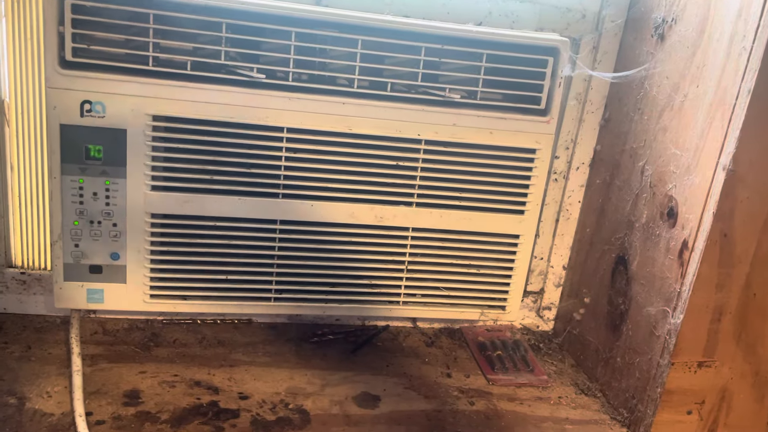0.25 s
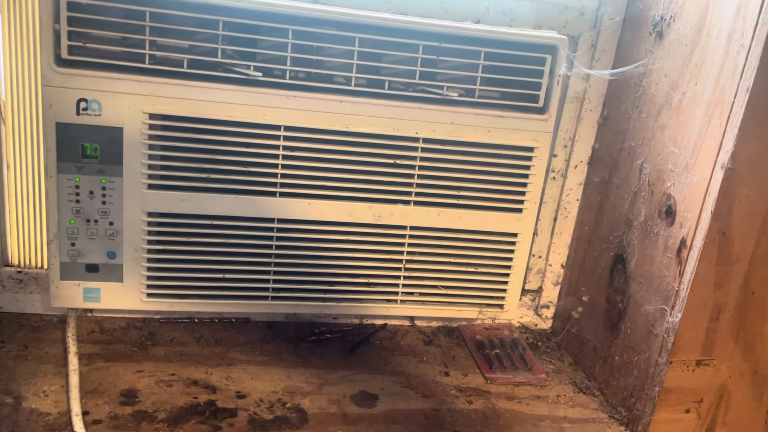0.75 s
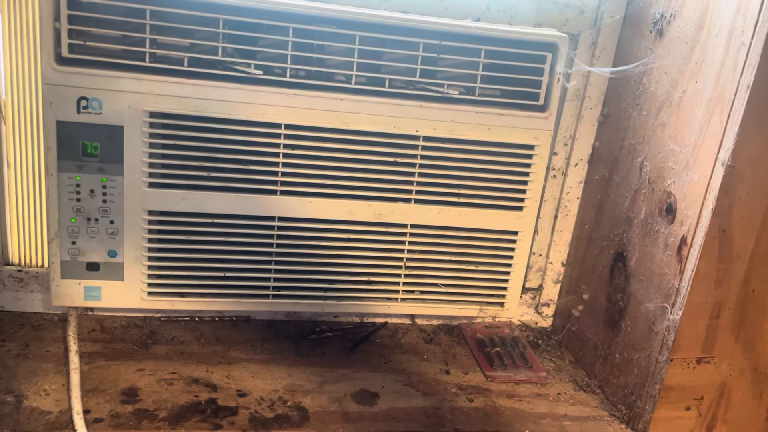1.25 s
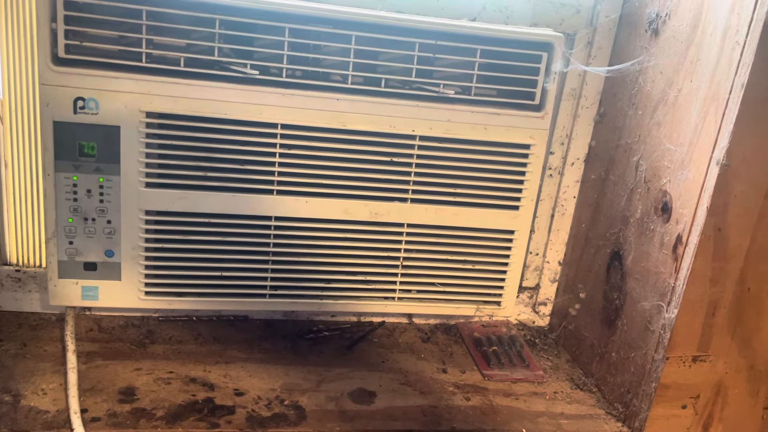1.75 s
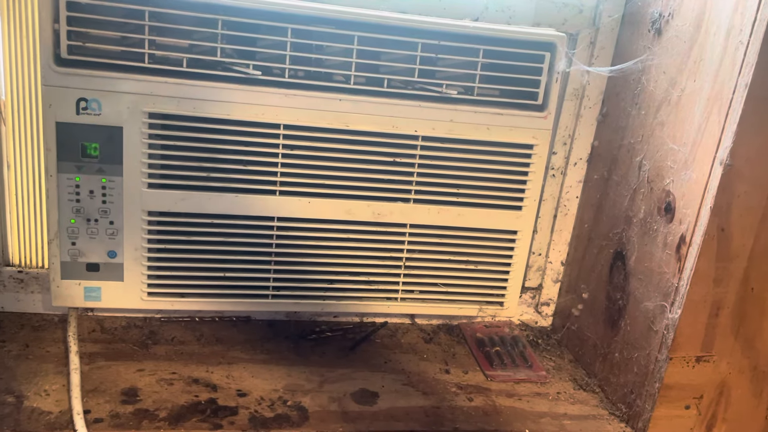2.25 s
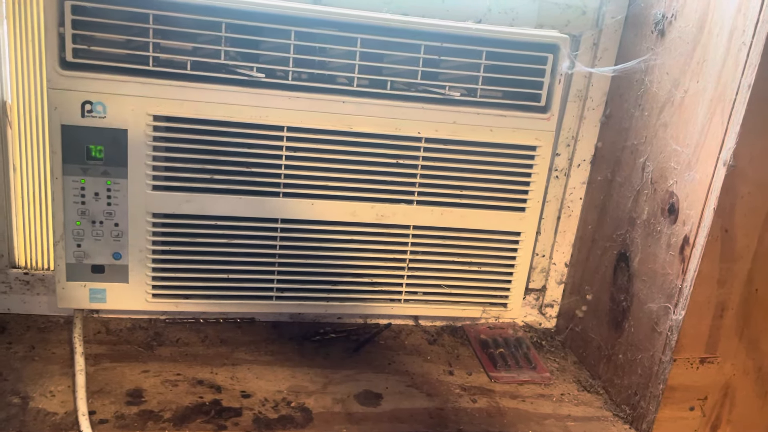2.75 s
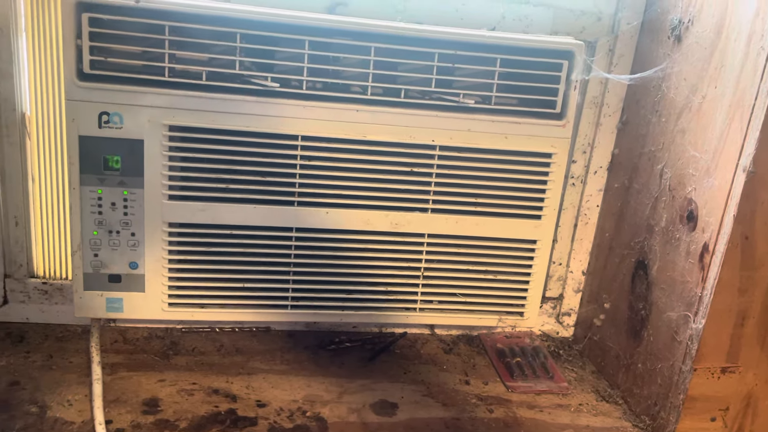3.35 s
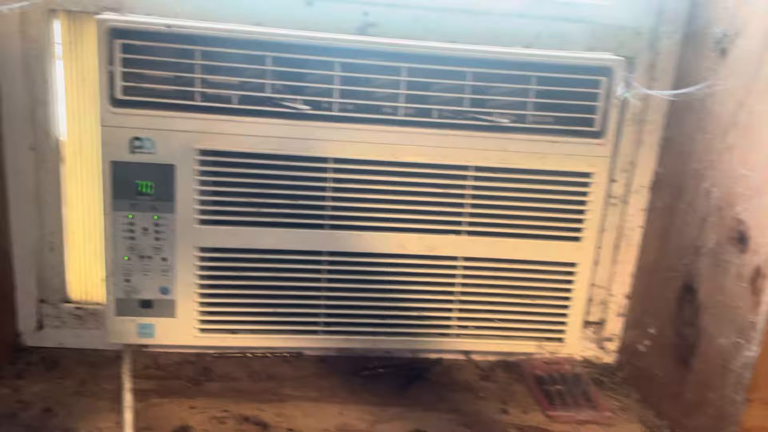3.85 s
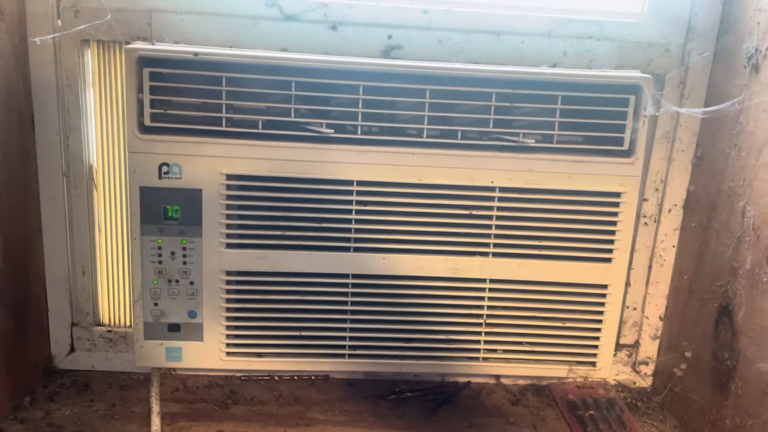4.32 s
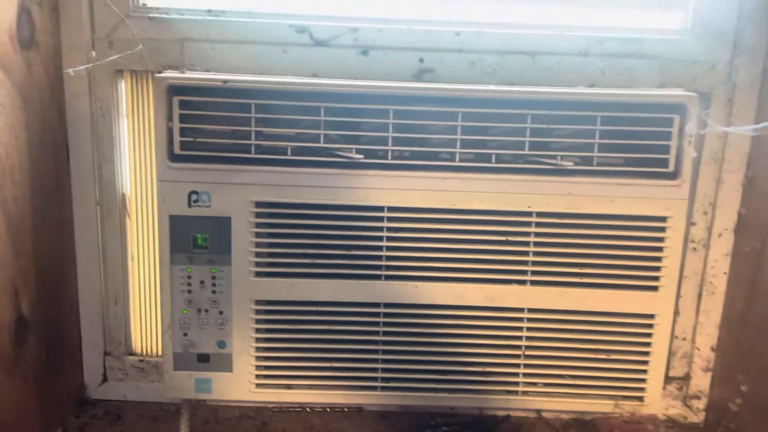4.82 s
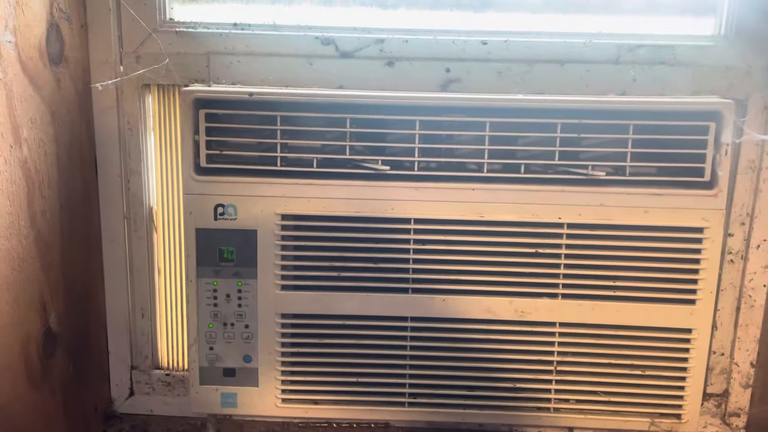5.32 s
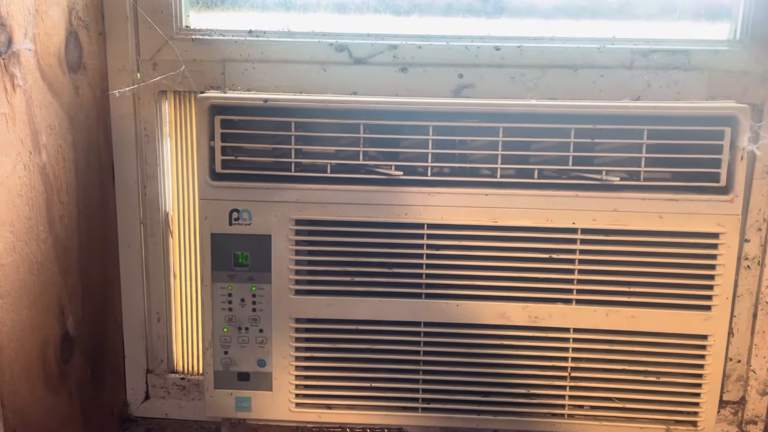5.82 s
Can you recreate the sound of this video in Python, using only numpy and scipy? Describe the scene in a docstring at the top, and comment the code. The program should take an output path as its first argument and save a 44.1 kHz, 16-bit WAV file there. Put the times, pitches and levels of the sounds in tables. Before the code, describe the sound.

Steady close machine noise: a deep, slightly wavering fan drone around 100 hertz, electrical buzz, faint thin whine, and thick turbulent air coloured by a resonant cabinet and grille. Short dull puffs of moving air bump the hand-held stereo microphone at uneven intervals. After about three seconds it rises from the lower grille toward the outlet, subtly shifting the tone while loudness stays nearly constant. The top end is dull.

```python
"""Air rushes through a window air conditioner in a wooden alcove: noise shaped by a resonant cabinet and grille.
The fan hums on multiples of its shaft speed, and the motor adds a buzz and a faint whine.
Eddies in the outflow buffet a hand-held stereo microphone with short low swings and noise.
The microphone moves from the lower grille up towards the outlet; the hand on its case rustles faintly."""
import sys
import numpy as np
from scipy import signal
from scipy.fft import rfft, irfft
from scipy.io import wavfile
from scipy.ndimage import map_coordinates

SR = 44100
rng = np.random.default_rng(int(sys.argv[2]) if len(sys.argv) > 2 else 0)


def dump_mix(stems):
    """Bounce the given channels to the path in sys.argv[1] as a 16-bit WAV at rate SR."""
    frames = np.atleast_2d(stems).T  # one column per channel
    limited = np.clip(frames, -1, 1)  # hard clip at full scale
    pcm = np.round(limited * 32767).astype(np.int16)
    wavfile.write(sys.argv[1], SR, pcm)


N = 268128
T = np.arange(N) / SR  # time in seconds
HZ = np.maximum(np.arange(N // 2 + 1) * SR / N, 1)  # spectrum frequencies, kept above zero for logs


def from_db(db):
    """Turn decibels into gain."""
    return 10 ** (np.asarray(db) / 20)


def at_hz(points, column=1):
    """Read a table's column at every frequency, joining its points on a log axis."""
    rows = np.array(points)
    return np.interp(np.log(HZ), np.log(rows[:, 0]), rows[:, column])


def white():
    """Make the spectrum of white noise at 0 dB per Hz."""
    return rfft(rng.standard_normal(N)) * np.sqrt(SR / 2)


def drift(rate):
    """Wander at random around 0 with spread 1, changing about rate times a second."""
    slow = irfft(white() / (1 + (HZ / rate) ** 2), N)
    return (slow - slow.mean()) / slow.std()


def swell(crest_s, half_s):
    """Rise and fall in a bell shape of height 1; half_s is the bell's standard deviation."""
    return np.exp(-.5 * np.minimum(((T - crest_s) / half_s) ** 2, 100))


def burst(crest_s, level_db, half_s, low_hz, high_hz):
    """Let noise in one band swell briefly, with the given rms level at its crest."""
    band = signal.butter(2, [low_hz, max(high_hz, low_hz + 10)], "band", fs=SR, output="sos")
    shape = swell(crest_s, half_s)
    near = abs(T - crest_s) < .25
    # filter a whole second twice, then use its settled end
    hiss = signal.sosfilt(band, signal.sosfilt(band, rng.standard_normal(SR)))
    noise = np.zeros(N)
    noise[near] = shape[near] * hiss[-near.sum():]
    return from_db(level_db) * noise * np.sqrt(np.sum(shape ** 2) / np.sum(noise ** 2))


def ports(balance_db, lead):
    """Give the left and right ports a level and phase difference, keeping their mean power at 1."""
    half = from_db(balance_db / 2) * np.exp(.5j * lead)
    pair = np.array([half, 1 / half]).reshape(2, -1)
    return pair / np.sqrt(np.mean(abs(pair) ** 2, axis=0))


# Faint brushes of the hand on the microphone's case, before the grain is added:
# (crest_s, level_db, half_length_s, low_hz, high_hz)
HAND_BRUSHES = [(1.713, -77.5, 0.011, 4600, 6700)]


def handling(grain_db=2.0, grain_per_s=250):
    """The hand shifts its grip: a soft noise burst with fast random level changes makes a grainy rustle."""
    grain = from_db(grain_db * (drift(grain_per_s) - .5))
    return sum(burst(*brush) for brush in HAND_BRUSHES) * grain


MAINS_HZ, MOTOR_DB = 60.015, -52
WHINE_HZ, WHINE_DB = 948, -72.5


def motor_hum(whine_wander_rad=0.81):
    """The windings buzz at twice the mains frequency, under a faint, slightly unsteady whine."""
    buzz = from_db(MOTOR_DB) * np.sin(2 * np.pi * 2 * MAINS_HZ * T)
    whine = from_db(WHINE_DB) * np.sin(2 * np.pi * WHINE_HZ * T + whine_wander_rad * drift(1.5))
    return np.sqrt(2) * (buzz + whine)  # the levels are rms


# Weaker eddies: how many, their peak level, range of swing rates, and half length in swings
WEAK_PER_S, WEAK_PEAK_DB, WEAK_SWING_HZ, WEAK_SWINGS = 2.5, -35, (60, 171), 1


def weak_eddies():
    """Eddies come off at loose intervals, each with its own swing rate; rows as in STRONG_EDDIES."""
    count = int(WEAK_PER_S * N / SR)
    eddies = []
    for k, (when, size) in enumerate(rng.random((count, 2))):
        crest_s = (k + when) / WEAK_PER_S
        swing_hz = np.interp(size, (0, 1), WEAK_SWING_HZ)
        eddies.append((crest_s, WEAK_PEAK_DB, swing_hz, WEAK_SWINGS))
    return eddies


# The strongest eddies striking the microphone; peak level and length are those of the smooth swing:
# (crest_s, peak_db, swing_rate_hz, half_length_swings)
STRONG_EDDIES = [(0.203, -23, 98, 0.45), (0.356, -29, 60, 0.96), (0.429, -27.5, 60, 1.15),
                 (0.503, -29, 80, 0.48), (0.91, -29.5, 65.4, 0.59), (1.025, -32, 60, 1.2),
                 (1.167, -22.5, 98, 0.77), (1.59, -23, 105, 0.41), (1.655, -27.5, 105, 0.37),
                 (2.43, -34, 65, 1.1), (3.13, -23.5, 74.6, 0.42), (3.156, -26.5, 64, 0.82),
                 (3.391, -22.5, 112, 0.62), (3.407, -29.5, 60, .7), (3.46, -27.5, 76.3, 0.65),
                 (3.58, -29.5, 89, 1.1), (3.81, -31.5, 58, 0.81), (3.849, -26, 79.7, 0.44),
                 (4.169, -31.5, 60, 0.99), (5.336, -19.5, 90, 0.41), (5.351, -22.5, 166, 0.6),
                 (5.362, -25, 116, 1.5), (5.387, -29.5, 60, 1.1), (5.597, -30, 85, 1.07),
                 (5.702, -29, 113, 1.1), (5.728, -30, 64, 1.3), (5.887, -24, 76.4, .45),
                 (5.94, -33.5, 58, 1.1), (6.038, -26.5, 105, 1.2)]


def buffeting(fringe_db=-15.0, apart_db=-17.5, fringe_hz=(32, 220), fringe_length=1.8):
    """Each eddy swings the pressure alike at both ports, in a fringe of noise that partly differs."""
    out = np.zeros((2, N))
    for crest_s, peak_db, swing_hz, swings in STRONG_EDDIES + weak_eddies():
        half_s = swings / swing_hz
        fringe_half_s = fringe_length * half_s
        swing = np.cos(2 * np.pi * (swing_hz * (T - crest_s) + rng.random()))
        shared = from_db(peak_db) * swell(crest_s, half_s) * swing
        # fringe levels are relative to the eddy's peak
        shared += burst(crest_s, peak_db + fringe_db, fringe_half_s, *fringe_hz)
        apart = burst(crest_s, peak_db + apart_db, fringe_half_s, *fringe_hz)
        out += [shared + apart, shared - apart]
    return out


SHAFT_HZ = 24.456
# Fan tones, with levels averaged in power over the two ports before the wavering:
# (shaft_multiple, level_db, left_right_db, left_lead_rad, slow_waver_db)
BLADE_TONES = [(4, -33.5, -0.7, 0.34, 0.55), (8, -57.5, 3, .28, 0.5), (10, -55.5, 4, 1, 0.5),
               (12, -50, 0, 0.87, 1.2), (15, -47.5, 1, 0.25, 0.1)]


def fan_hum(wander_rad=0.034, waver_per_s=0.63, rough=0.028):
    """Blade tones are locked to one turning shaft; uneven inflow shakes their strength."""
    angle = 2 * np.pi * SHAFT_HZ * T + wander_rad * drift(0.27)
    out = np.zeros((2, N))
    for multiple, level_db, balance_db, lead, waver_db in BLADE_TONES:
        tone = np.exp(1j * (multiple * angle + rng.uniform(0, 2 * np.pi)))
        strength = from_db(level_db + waver_db * drift(waver_per_s))
        strength = strength * (1 + rough * drift(24))
        out += np.sqrt(2) * strength * (ports(balance_db, lead) * tone).real
    return out


# The microphone's path from the lower grille (0) up towards the outlet (1): (time_s, place_0_to_1)
MICROPHONE_PATH = [(3.2, 0), (4.1, 0.6), (4.7, 0.71), (5.1, .97)]


def rise():
    """The microphone's place over time, in straight moves between the path's points."""
    return np.clip(np.interp(T, *np.transpose(MICROPHONE_PATH)), 0, 1)


def boards(echo_db=-21, near_s=0.0033, far_s=.017, lowest_hz=1400, count=10):
    """The alcove's boards return faint early echoes of short waves, which ripple the rush at each port."""
    delays = rng.uniform(near_s, far_s, (count, 2, 1))
    reflected = from_db(echo_db) / (1 + (lowest_hz / HZ) ** 4)  # weak below lowest_hz
    response = 1 + reflected * sum(np.exp(-2j * np.pi * HZ * delay) for delay in delays)
    return response / np.sqrt(1 + count * reflected ** 2)


def sway(sound, depth=.003, per_s=3.0):
    """The uneven flow bends the resonances a little up and down; depth is a share of their pitch."""
    read_at = np.arange(N) + np.cumsum(depth * drift(per_s))
    return np.array([map_coordinates(side, [read_at], order=1, mode="grid-wrap") for side in sound])


# Cabinet and alcove resonances: (pitch_hz, width_hz, lift_at_lower_grille_db, lift_at_outlet_db)
CABINET_RESONANCES = [(228, 9.6, -4, -1.5), (242, 23, 0.5, 2), (285.3, 22, -7, -6), (304.4, 14, -3.5, -7),
                      (312.3, 14.2, 9, 9), (318.7, 7, 3.5, 1), (330.6, 28.5, 5.5, 4), (361, 8.8, 3, 0.5),
                      (388, 20, 4.5, 5), (432, 18, -3.5, -2), (473, 55, -1, -2.5), (600.7, 45, 7.5, 9.5),
                      (646.7, 55, 4.5, 7), (689, 16, -6, -6.5), (723, 24, 1, 2), (730, 83, 9.5, 12),
                      (891, 65, 7.5, 8.5), (993, 71, 3, 6.5), (1053, 111, 11, 5), (1218, 58, 2.5, 7),
                      (1336, 170, 6, 6), (1520, 110, 3, 5.5), (1630, 64, -6, 1), (1775, 110, 5, 7),
                      (1930, 50, -5.5, -4.5), (1960, 170, 5, 1), (2200, 140, 3, -1.5), (2420, 76, -6, -4.5),
                      (2540, 350, 2, 1), (2880, 300, -2, 0.5), (3350, 130, 4, 0.5), (3410, 70, -4, -1.5),
                      (3530, 94, 2.5, -1), (4220, 120, 1.5, -0.5), (4500, 300, 0, -1)]
# Level difference between the microphone's two ports: (pitch_hz, left_right_db)
PORT_BALANCE = [(100, 0.5), (230, 0), (290, 1.5), (440, 3), (540, -2.5), (690, 6), (780, 4), (870, 7.5),
                (1050, 8.5), (1280, 1), (2000, 3.5), (2650, -1.5), (3500, 0.5), (7500, 0), (8600, 6.5),
                (10500, 2.5)]
# How alike the ports' sounds are, held within 0 to 1 when used: (pitch_hz, likeness_0_to_1)
PORT_LIKENESS = [(25, 0.93), (60, 1), (200, 0.92), (320, 0.99), (400, 0.92), (480, 0.9), (535, 0),
                 (630, 0.98), (680, 0.4), (735, 0.83), (830, 0.5), (880, .6), (950, 0.1), (1060, .68),
                 (1160, 0.5), (1230, 0.6), (1300, .45), (1380, 0.7), (1660, .7), (1800, .93), (2080, .87),
                 (2350, 0.2), (2700, .72), (3900, .6), (4500, 0.72), (5400, 0.05), (7900, 0.6),
                 (9000, 0.02)]
# Phase difference between the ports: (pitch_hz, left_lead_at_lower_grille_rad, left_lead_at_outlet_rad)
PORT_LEAD = [(150, 0.25, 0.32), (250, 0.65, 0.5), (370, 0.98, 0.67), (436, 1.5, 1.5), (472, 1.4, 1),
             (560, 3, -0.5), (610, 1, 1.16), (661, 2, 1), (680, -1.5, -1.5), (723, 0.27, 0.5), (820, 3, 2),
             (841, -5.5, -1.5), (884, -1, -1), (1020, 0.8, -1), (1130, -0.2, -2.5), (1213, -2, -2),
             (1400, 0.15, -1.2), (1900, 0, 0.2), (2260, -0.8, -2.5), (2400, -0.5, 1), (2800, 0.8, -1.5),
             (3160, -1, -1.4), (3720, -0.5, -3.5), (4030, -1, -4.5), (4430, -0.3, -5.5), (4900, -0.5, -7),
             (5400, -3, -8), (6300, -0.8, -8), (7900, -2.5, -9)]


def airflow(spectrum, place, echoes):
    """Resonances colour the turbulence, heard by both ports at place 0 (lower grille) or 1 (outlet)."""
    lift_db = 0
    for pitch_hz, width_hz, *lifts in CABINET_RESONANCES:
        lift_db = lift_db + lifts[place] * 2 ** -((2 * (HZ - pitch_hz) / width_hz) ** 2)
    alike = np.clip(at_hz(PORT_LIKENESS), 0, 1)
    # direct sound is shared by the ports, the diffuse sound of the room is not
    direct = np.sqrt(alike) * white()
    diffuse = np.sqrt(1 - alike) * np.array([white(), white()])
    heard = ports(at_hz(PORT_BALANCE), at_hz(PORT_LEAD, column=place + 1))
    colour = from_db(at_hz(spectrum) + lift_db)
    return irfft((direct + diffuse) * echoes * heard * colour, N)


# Turbulence in the blower, before trim and resonances: (pitch_hz, level_db_per_hz)
BLOWER_ROAR = [(18, -88), (35, -69.5), (60, -62), (115, -56.5), (160, -61), (210, -65.5), (250, -62),
               (400, -66), (485, -66.5), (550, -79), (810, -80.5), (1200, -87.5), (2150, -90), (2500, -110),
               (5000, -160)]
# Hiss of air through the fins and louvres, before trim and resonances: (pitch_hz, level_db_per_hz)
GRILLE_HISS = [(800, -150), (1500, -115), (2400, -95.5), (3000, -96), (3450, -97), (3850, -104),
               (4600, -106), (5300, -112), (5800, -119), (6500, -119), (7850, -126), (8150, -123.5),
               (9200, -125.5), (10500, -134), (12000, -138)]
BLOWER_TRIM_DB, GRILLE_TRIM_DB = -1.03, 0.05
GRILLE_AT_OUTLET_DB = -0.3  # change in the hiss on the way from lower grille to outlet


def rush(blower_churn_db=0.95, grille_churn_db=0.99):
    """Blower roar and grille hiss churn at random and change colour as the microphone moves."""
    moved = rise()
    turn = moved * np.pi / 2
    blower = from_db(BLOWER_TRIM_DB + blower_churn_db * drift(33))
    grille = from_db(GRILLE_TRIM_DB + GRILLE_AT_OUTLET_DB * moved + grille_churn_db * drift(25))
    out = np.zeros((2, N))
    # cosine and sine shares fade one place into the other without a dip in power
    for place, share in enumerate([np.cos(turn), np.sin(turn)]):
        echoes = boards()
        roar = blower * sway(airflow(BLOWER_ROAR, place, echoes))
        hiss = grille * airflow(GRILLE_HISS, place, echoes)
        out += share * (roar + hiss)
    return out


def scene():
    """Add the hand, the motor, the gusts on the microphone, the fan and the rushing air."""
    return handling() + motor_hum() + buffeting() + fan_hum() + rush()


TRACE_HZ, CUTOFF_HZ = 12000, 12380


def record(dry, rumble_cut_hz=22, trace_db=-68):
    """The microphone sheds deep rumble, a very faint trace is added around 12 kHz, and the top is cut."""
    rumble_cut = signal.butter(2, rumble_cut_hz, "high", fs=SR, output="sos")
    thinned = signal.sosfilt(rumble_cut, dry)
    # the trace is a high tone that follows the sound's own waveform
    trace = from_db(trace_db) * np.cos(2 * np.pi * TRACE_HZ * T) * thinned
    top_cut = signal.ellip(12, .1, 80, CUTOFF_HZ, fs=SR, output="sos")
    return signal.sosfilt(top_cut, thinned + trace)


dry = scene()
out = record(dry)
dump_mix(out)
```